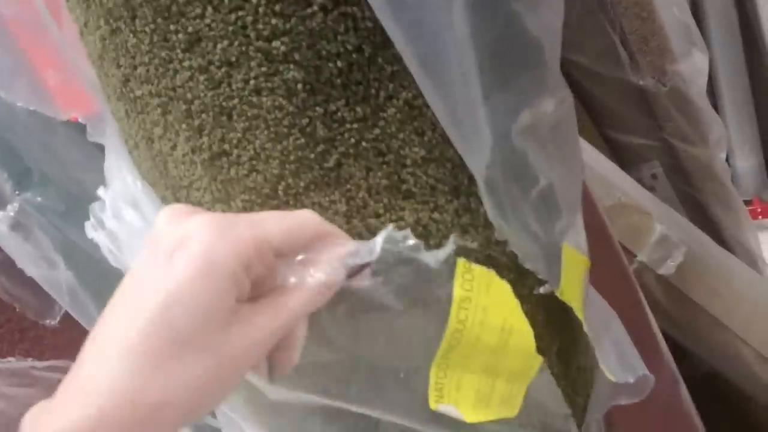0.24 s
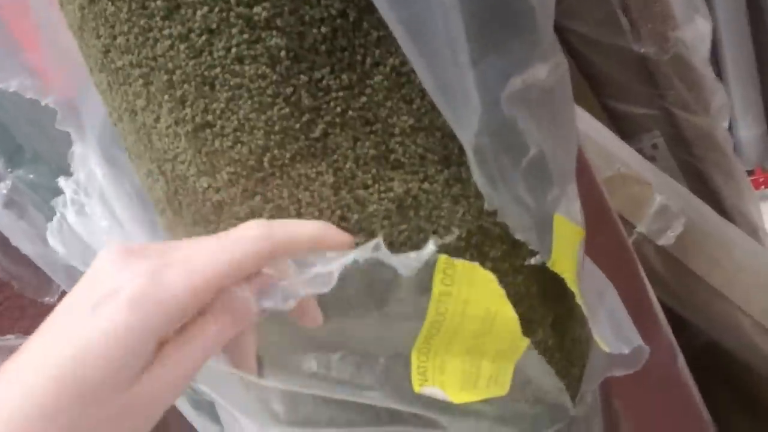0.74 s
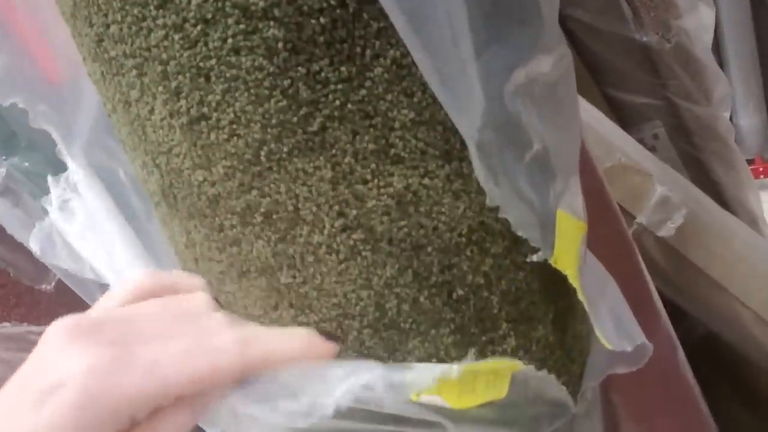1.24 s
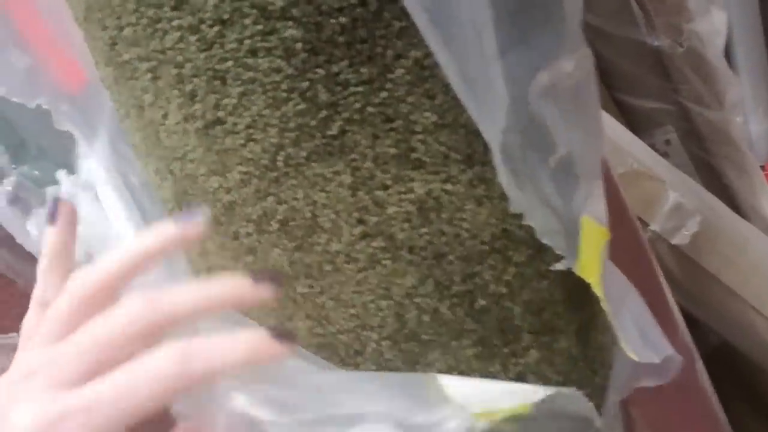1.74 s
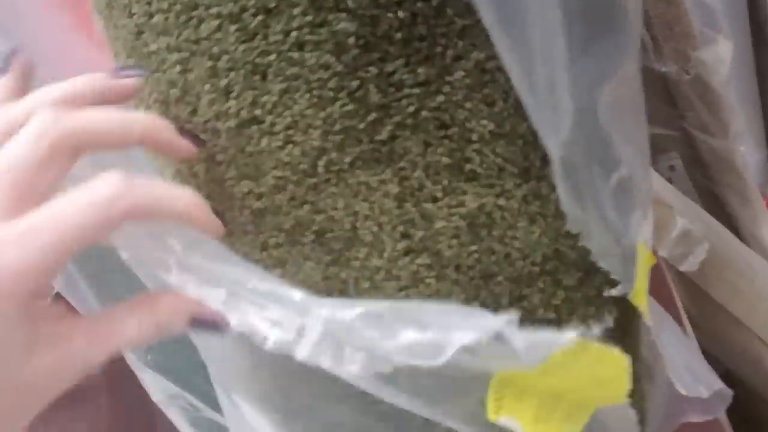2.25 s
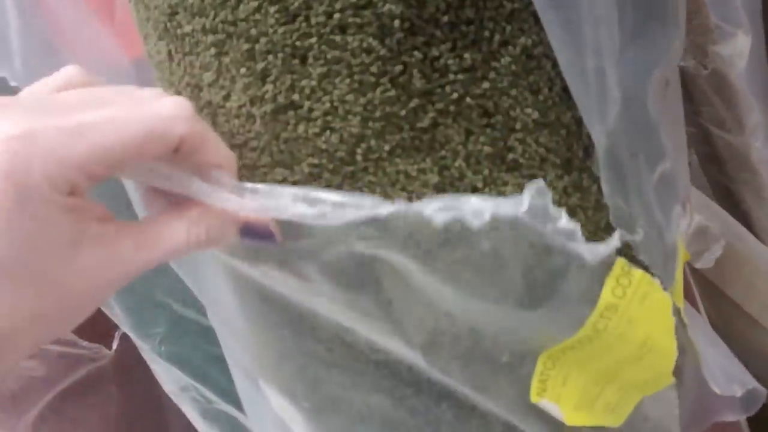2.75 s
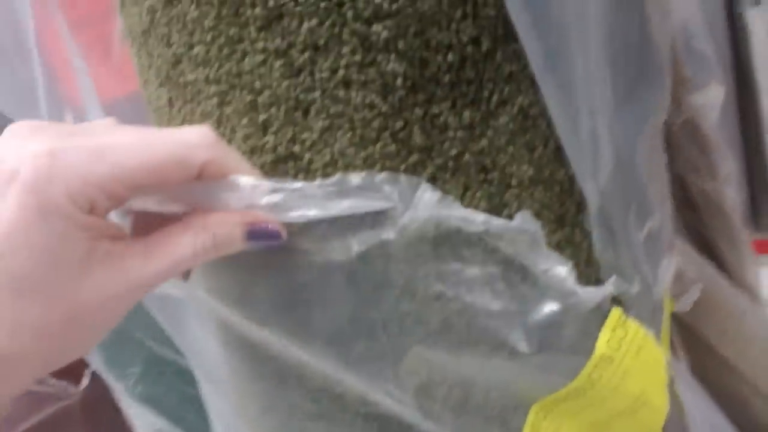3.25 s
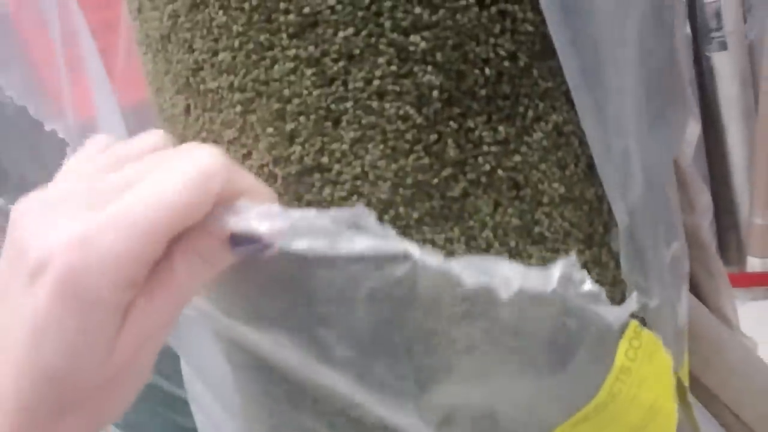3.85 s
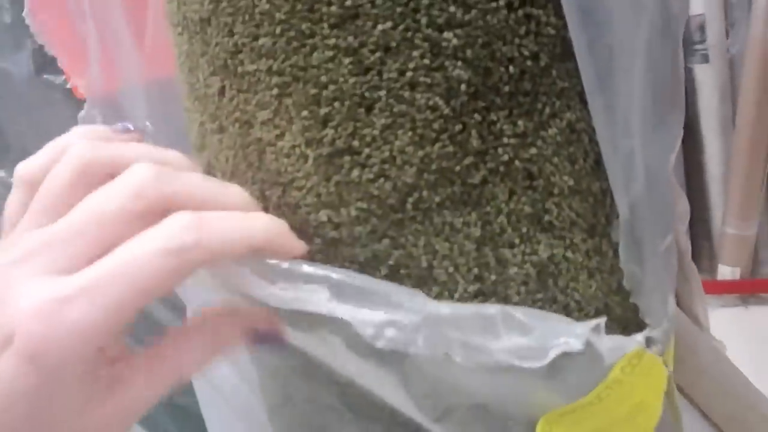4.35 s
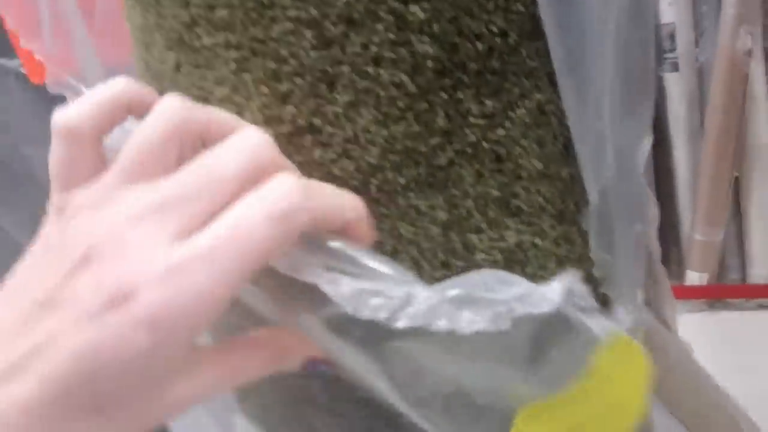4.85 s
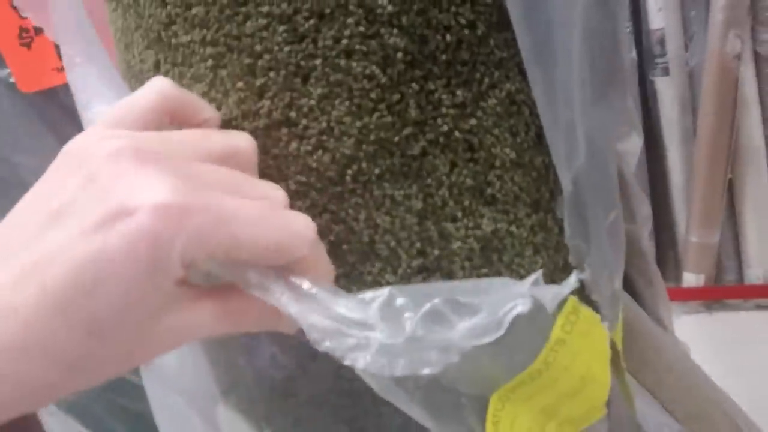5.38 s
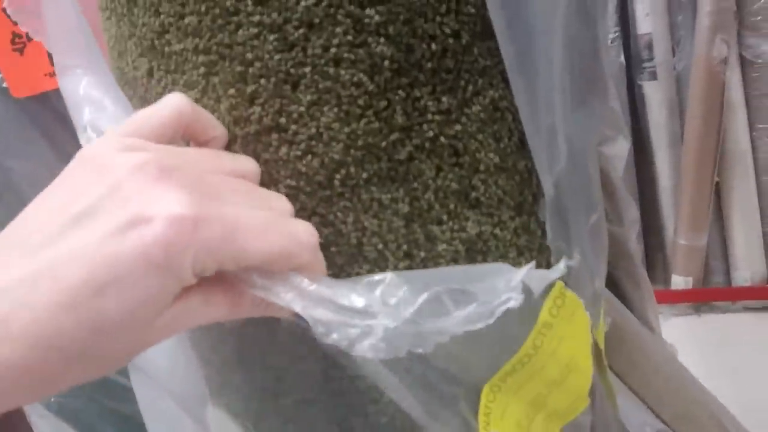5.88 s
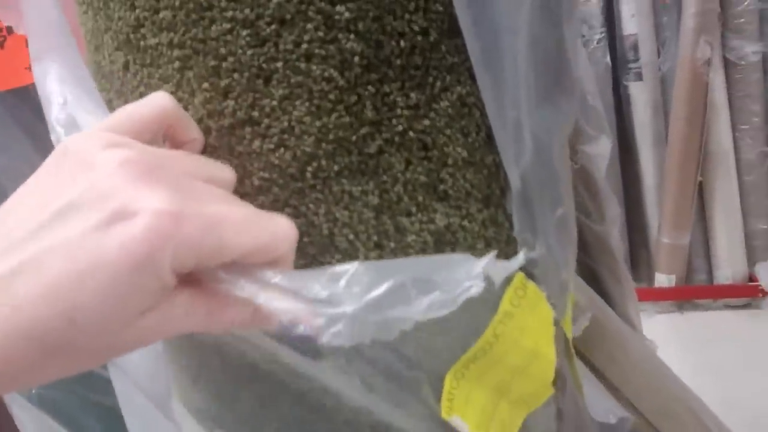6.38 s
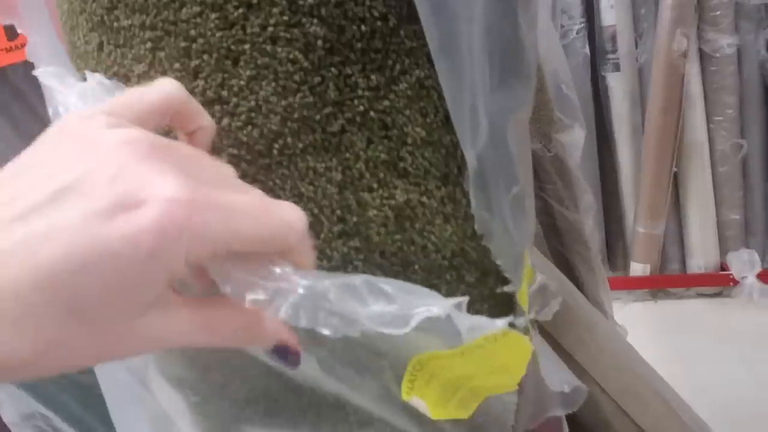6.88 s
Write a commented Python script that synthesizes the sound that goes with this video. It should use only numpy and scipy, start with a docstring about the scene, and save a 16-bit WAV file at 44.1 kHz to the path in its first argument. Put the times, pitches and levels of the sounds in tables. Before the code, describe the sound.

Close, irregular pops and crackles of clear plastic film being pulled and bent, whispering over carpet pile, a brief low air push near two seconds.

```python
"""Sharp snaps and crackles of thin plastic sheeting, pulled and crinkled by hand on a carpet roll.
Each snap is a crease flipping over: short tones ring small patches of film, and noise shivers on after.
Uneven noise makes the rustle of the bending film and its whisper as it slides over the pile.
Low noise rumbles, swelling briefly with a push of air; behind it all the hall's ventilation hums.
Two microphones close by hear it in stereo."""
import sys
import numpy as np
from scipy import signal
from scipy.fft import rfft, irfft, next_fast_len
from scipy.io import wavfile
from scipy.ndimage import map_coordinates

SR = 44100
rng = np.random.default_rng(int(sys.argv[2]) if len(sys.argv) > 2 else 0)


def bounce(signal):
    """Save signal as a 16-bit WAV file at the path given by the first command-line argument."""
    frames = np.transpose(np.atleast_2d(signal))
    limited = np.clip(frames, -1, 1)
    pcm = np.round(limited * 32767).astype(np.int16)
    wavfile.write(sys.argv[1], SR, pcm)


N = 313992  # length in samples

# Creases that snap: (time [s], main patch pitch [Hz], small patch pitch [Hz], energy of thump [dB],
# of main patch [dB], of small patches [dB], of crease edge [dB], of tick [dB], left over right [dB])
SNAPS = [(.0399, 1540, 2310, -41, -39, -34.5, -40, -48.5, -7),
         (.2073, 1010, 2320, -28, -19, -31, -50, -54, 3),
         (.2135, 1355, 1830, -23.5, -9, -17.5, -34, -39, -0.5),
         (.413, 1140, 2380, -40, -44, -45, -43, -31, 4.5), (.4321, 1020, 2080, -43, -35, -35, -47, -41, 1),
         (.4504, 1140, 1840, -36, -30, -41, -49, -55, -3), (.5466, 610, 1910, -34, -29, -30, -53, -47, 0),
         (.5654, 1160, 2460, -30, -24, -25, -43, -43, 1), (.6189, 1040, 2160, -54, -28, -43, -44, -43, -2),
         (.6722, 970, 2370, -28, -27, -40.5, -56, -56, -4),
         (.699, 750, 2100, -32.5, -30.5, -46, -58, -57, -5), (.8691, 970, 1810, -54, -29, -47, -60, -60, 1),
         (.9468, 1207, 2620, -41, -5.5, -2.5, -13, -16, 1),
         (.9519, 1170, 2500, -23, -41, -38, -28, -22, -1), (.9709, 1080, 2580, -22, -10, -6, -22, -21, 0.5),
         (1.0756, 920, 2190, -31, -33, -54, -50, -60, -3),
         (1.1052, 1080, 1790, -29, -32.5, -37, -58, -55, 2),
         (1.3994, 1730, 1890, -42, -43, -48, -39, -35.5, 0),
         (1.4129, 624, 3320, -42, -35, -22.5, -29.5, -45, -1),
         (1.4398, 650, 2800, -50, -35, -34, -40, -55, 0),
         (1.5055, 806, 3070, -33, -31, -24.5, -41, -49, 0.5),
         (1.7914, 790, 3300, -30, -36, -38, -36, -38, -7),
         (1.8216, 604, 2190, -44, -32, -40, -44, -31, -3.5),
         (1.8661, 610, 2170, -49, -31, -36, -39, -32, -5),
         (1.8834, 600, 3060, -28.5, -34, -38, -40, -48, 2),
         (1.9308, 680, 3320, -52, -38, -41, -47, -29, -3), (1.962, 610, 3680, -23, -35, -53, -59.5, -52, 1),
         (2.1022, 730, 2110, -47, -23, -28, -52, -54, 3), (2.1214, 1160, 2190, -34, -26, -52, -57, -54, 2),
         (2.149, 910, 2070, -21, -3.5, -9, -23, -28, -3.5),
         (2.1939, 730, 2280, -36, -24, -22.5, -54, -54, -3),
         (2.2439, 870, 3840, -48, -33, -42, -44.5, -55, -2),
         (2.3329, 615, 3080, -38, -29, -44, -59.5, -59, 2), (2.4385, 770, 2950, -27, -23, -26, -54, -59, 3),
         (2.602, 1150, 2490, -34, -8.5, -10.5, -27, -57, 1.5),
         (2.6115, 1120, 1850, -33, -32, -48, -37, -50, -2.5),
         (2.7315, 1150, 2590, -53, -27, -53, -59, -59, -2),
         (2.779, 950, 2140, -30, -25.5, -34.5, -47, -58, 2.5),
         (2.8196, 1350, 2390, -47, -31, -37, -58, -56, -8),
         (2.8345, 1280, 2060, -20, -34, -40, -58, -60, -2),
         (2.8557, 1420, 2270, -19, -6.5, -14.5, -18, -28, 0.5),
         (3.0421, 815, 2380, -37, -33, -42, -48, -60, -3), (3.1, 815, 2360, -39, -33, -45, -59, -65, 2),
         (3.1717, 1320, 2050, -50.5, -25, -19, -12, -19, -0.5),
         (3.364, 1410, 2100, -59, -23.5, -14, -20.5, -32, -1),
         (3.3961, 1100, 3100, -62, -25.5, -21.5, -19.5, -15.5, .5),
         (3.4574, 1170, 2450, -57, -23, -30.5, -52, -50, 2),
         (3.7483, 1050, 2090, -48, -31.5, -41, -48, -54, 0),
         (3.8788, 1070, 1810, -42, -35.5, -53, -57, -57, -1),
         (4.0208, 1460, 1980, -38, -27, -39, -40, -58, 0), (4.06, 895, 2300, -33.5, -30, -44, -57, -57, -4),
         (4.3834, 640, 3220, -50, -12.5, -18, -31, -35, 2),
         (4.4883, 603, 2130, -34, -35, -47, -38, -48, 3.5),
         (4.6583, 616, 2540, -33.5, -36, -47, -64, -50, 8),
         (4.7016, 1260, 3500, -40, -22, -26.5, -46, -48, -4),
         (4.7437, 795, 1830, -57, -30, -37, -39, -37, 4), (4.8967, 1210, 3210, -47, -34, -41, -35, -37, 0),
         (4.9157, 800, 2380, -33, -26, -35, -44, -47, -1),
         (4.933, 1440, 1810, -30.5, -29.5, -49, -56, -56, -3),
         (5.037, 980, 1790, -42, -21.5, -30, -53, -54, 1), (5.0607, 1020, 1820, -28, -20, -39, -52, -57, 0),
         (5.0802, 1020, 2050, -35, -22, -42, -51, -49, 0),
         (5.2082, 980, 1950, -21.5, -16, -23.5, -29, -40, 1),
         (5.2885, 1250, 1970, -42, -28, -54, -48, -56, -3),
         (5.3378, 1040, 1990, -32, -21, -29, -35.5, -41, 6.5),
         (5.3487, 1360, 1940, -41, -16, -13, -37, -49, -3),
         (5.519, 1200, 2420, -31, -18.5, -15, -35, -40, 1.5),
         (5.528, 1310, 1800, -50, -20, -41, -47.5, -49, -1),
         (5.717, 540, 2430, -29, -13.5, -22.5, -42, -46, 1.5),
         (5.7898, 1120, 1830, -25, -15, -50, -53, -55, -1.5),
         (6.0307, 1470, 2130, -29, -10.5, -13.5, -11.5, -5.5, 3),
         (6.036, 1050, 1810, -28, -37, -22, -24, -37, -4),
         (6.0493, 1110, 2660, -29, -13, -19.5, -33, -32, 0.5),
         (6.094, 1150, 3220, -28, -16.5, -27, -44, -42, 0.5),
         (6.1787, 1350, 1810, -32, -36, -58, -62, -61, -3),
         (6.2098, 1100, 2160, -49, -34.5, -40, -46, -48, -4),
         (6.3246, 1350, 1930, -27.5, -25, -38, -46, -52, -1),
         (6.3497, 810, 2410, -47, -29, -53, -59, -57, 6), (6.3758, 1200, 2510, -17, -8, -16, -30, -32, -1),
         (6.7464, 850, 2470, -49, -32, -46, -56, -45, 3), (6.9347, 1380, 2840, -38, -43, -40, -34, -39, 0),
         (6.9573, 1280, 2310, -25, -19.5, -26.5, -44, -37, 0),
         (6.9894, 1430, 4220, -45, -33, -56, -48, -41, -1),
         (7.0685, 1170, 2300, -29, -24, -43, -58, -54, -3),
         (7.0798, 1320, 2030, -23.5, -19, -30.5, -58, -59, -3),
         (7.0994, 1430, 1810, -44, -22, -45, -58, -61, -4)]
# Patches that ring in a snap, from large and slack to the crease tip: (lowest pitch [Hz],
# highest pitch [Hz], time to fade 60 dB [s], shiver against ring [dB], shiver's time to fade 60 dB [s])
PATCHES = [(269, 498, 0.02, -6.5, 0.082), (579, 1590, 0.017, -4.5, 0.035),
           (1990, 4080, 0.0066, -10.5, 0.03), (4270, 9150, 0.0041, -18, 0.085),
           (8740, 16300, 0.0038, -7, 0.035)]


def snaps():
    """Each crease creeps, flips and rings a few patches of every size; the film shivers on after it."""
    creep_db, creep_s, shiver_rise_s = -24, 0.0014, 0.00038
    out = np.zeros((2, N + SR))
    t = np.arange(SR // 16) / SR
    lead = SR // 250  # samples kept before the snap time
    noises = [soft_band_noise(low, high) for low, high, *_ in PATCHES]
    for s, main_hz, small_hz, *energy_db, pan_db in [*SNAPS, *crumples(), *faint_creases()]:
        left_lag_ms = -0.025 + 0.04 * pan_db  # a louder left side hears the snap later
        # time since the flip at each microphone
        since = t - lead / SR - .0005 - np.array([[1], [-1]]) * left_lag_ms / 2000
        after, before = np.maximum(since, 0), np.maximum(-since, 0)
        start = round(s * SR) - lead
        span = slice(start, start + len(t))
        side_gain = np.array([[pan_db], [-pan_db]]) / 2
        way = rng.choice([-1, 1])  # the film flips up or down
        leaders = (None, main_hz, small_hz, None, None)
        for patch, leader_hz, noise, db in zip(PATCHES, leaders, noises, energy_db):
            _, _, _, shiver_db, shiver_t60 = patch
            ring = way * patch_ring(patch, leader_hz, since)
            swell = amp(-60 * after / shiver_t60) * (1 - np.exp(-after / shiver_rise_s))
            creep = np.exp(-before / creep_s) * (before > 0)
            sound = unit(ring)
            sound += amp(shiver_db) * unit(noise[:, span] * swell)
            sound += amp(creep_db) * unit(noise[:, span] * creep)
            # a level of energy, so the length of the window does not count
            out[:, span] += sound * amp(db + side_gain) / np.sqrt(len(t))
    # thin film moves too little air to radiate bass
    high_pass = signal.butter(4, 250, "high", fs=SR, output="sos")
    return signal.sosfilt(high_pass, out[:, :N])


def patch_ring(patch, leader_hz, since, apart_s=.00003, rise_cycles=0.49):
    """Five patches of one size class ring as fading tones that all start with the flip."""
    low, high, t60, *_ = patch
    after, before = np.maximum(since, 0), np.maximum(-since, 0)
    hz = low * (high / low) ** ((np.arange(5) + rng.random(5)) / 5)
    strength = amp(rng.normal(0, 3.36, size=(5, 2, 1)))
    if leader_hz is not None:  # one patch leads; the nearer another is in size, the more it joins in
        hz[2] = leader_hz
        strength *= amp(-13 * np.abs(np.log2(hz / hz[2])))[:, None, None]
        strength[2] = 2.7
    # each patch lies elsewhere on the sheet, so its path to the two microphones differs
    path = rng.normal(0, apart_s, size=(5, 2, 1))
    # all patches swing the same way at the flip, which makes the sharp spike
    tones = np.cos(2 * np.pi * hz[:, None, None] * (since + path) - .3)
    fade = amp(-60 * after / t60)
    rise = np.exp(-(before * low / rise_cycles) ** 2)
    return np.sum(strength * tones, axis=0) * fade * rise


def soft_band_noise(low, high):
    """Stereo noise with gently sloping edges, for the film's creep and shiver."""
    noise = rng.standard_normal((2, N + SR))
    return filtered(noise, lambda hz: 1 / (1 + (low / (hz + 1)) ** 4 + (hz / high) ** 4))


# Crumples, runs of small creases: (start [s], length [s], energy of thump [dB], of main patch [dB],
# of small patches [dB], of crease edge [dB], of tick [dB])
CRUMPLES = [(1.752, 0.0053, -38.5, -33, -29.5, -18.5, -21), (1.842, 0.0097, -36, -38, -30.5, -37, -22.5),
            (2.169, .013, -34, -12.5, -29, -21, -22), (2.173, 0.026, -15, -21, -34, -45, -44)]


def crumples(count=7):
    """Each crumple is a run of creases of scattered time, pitch and size, listed like the snaps."""
    rows = []
    for s, length, *energy_db in CRUMPLES:
        for when, main, small, size, pan in rng.random((count, 5)):
            # the creases share the energy of the crumple
            share_db = np.add(energy_db, 9 * (size - .5) - 10 * np.log10(count))
            main_hz, small_hz = 650 + 700 * main, 1900 + 2000 * small
            rows.append((s + length * when, main_hz, small_hz, *share_db, 5 * (pan - .5)))
    return rows


# Typical energy of a faint crease: (thump [dB], main patch [dB], small patches [dB],
# crease edge [dB], tick [dB])
FAINT_ENERGY = (-45, -40, -48, -56, -54)


def faint_creases(count=70, scatter_db=4):
    """Faint creases at chance moments, the denser the harder the film bends, listed like the snaps."""
    share = np.cumsum(amp(curves(BEND)[0]))
    when, main, small = rng.random((count, 3)).T
    scatter = rng.standard_normal((count, 6))
    s = np.interp(when, share / share[-1], np.arange(N) / SR).clip(.01)
    energy_db = FAINT_ENERGY + scatter_db * scatter[:, :5]
    pan_db = 4 * scatter[:, 5] - 1.5
    return np.c_[s, 600 + 950 * main, 1800 + 2000 * small, energy_db, pan_db]


# How hard the film bends, heard as rustle: (time [s], level [dB])
BEND = [(0, -71), (.2, -67), (.45, -61), (.63, -61), (.8, -64), (1.05, -63.5), (1.19, -71.5), (1.44, -66),
        (1.75, -71), (1.89, -65.5), (2.16, -63), (2.43, -68), (2.55, -63), (2.88, -63), (3.0, -67.5),
        (3.42, -66), (3.53, -74), (3.78, -62), (3.88, -65), (4.05, -61.5), (4.32, -73), (4.5, -64),
        (4.75, -64), (5.04, -59.5), (5.17, -65.5), (5.34, -58), (5.65, -70), (5.85, -65), (6.05, -63),
        (6.21, -73), (6.39, -61.5), (6.7, -67), (6.93, -64), (7.12, -63)]
# Colour of the rustle: (frequency [Hz], level per Hz [dB])
RUSTLE = [(600, -26.5), (1000, -5.5), (1380, -3.5), (1700, -10.5), (2400, -8.5), (3000, -12), (3800, -13.5),
          (7000, -24)]


def rustle():
    """Bending film gives many tiny slips, made as noise of uneven strength."""
    level_db, = curves(BEND)
    return amp(level_db) * grainy(RUSTLE, spiky_db=3.0, clump_db=0.0, clump_rate=71)


# Colour of the slack folds: (frequency [Hz], level per Hz [dB])
DULL = [(180, -14.5), (340, 1.5), (550, -4), (850, -5), (1500, -25)]


def slack_folds(mean_db=-67, follows=0.29, flap_db=-14):
    """Slack folds sound dull; they follow the bending and flap in the push of air."""
    bend_db, = curves(BEND)
    draught_db, = curves(DRAUGHT)
    bending = amp(mean_db + follows * (bend_db - bend_db.mean()))
    flapping = amp(draught_db + flap_db)
    return (bending + flapping) * grainy(DULL, spiky_db=3.0, clump_db=2.0, clump_rate=27)


# The film slides over the pile: (time [s], whisper level [dB], level of its thin top [dB])
SLIDE = [(0, -87, -79), (.18, -74, -73), (.38, -65.5, -71), (.6, -64.5, -64.5), (.81, -74, -75),
         (.99, -58, -67), (1.12, -90, -84), (1.3, -67, -69), (1.5, -68, -82), (1.73, -60, -56.5),
         (1.89, -61, -60), (2.07, -65.5, -65.5), (2.2, -70, -70), (2.3, -65, -72), (2.45, -75, -78),
         (2.85, -71.5, -81), (3.0, -73, -79), (3.3, -78, -78), (3.42, -68, -68), (3.53, -80, -78),
         (3.69, -75, -75), (3.79, -64, -66), (3.97, -73, -77), (4.23, -63, -68), (4.36, -69.5, -72),
         (4.52, -59.5, -59.5), (4.77, -77, -71), (4.87, -86, -63), (4.96, -72, -73), (5.12, -85.5, -73),
         (5.3, -66, -71), (5.6, -78, -77), (5.92, -88, -78), (6.05, -63, -68), (6.24, -81, -77),
         (6.45, -68.5, -71), (6.75, -66, -68), (6.93, -59, -60.5), (7.12, -71, -68)]
# Colour of the whisper: (frequency [Hz], level per Hz [dB])
WHISPER = [(1500, -10), (3800, 1), (5000, 0), (6800, -3), (8600, 1), (10000, -7), (13000, -33)]
# Colour of the finest slips, the thin top: (frequency [Hz], level per Hz [dB])
THIN = [(6000, -26), (9500, -9), (11000, 3.5), (15000, 6.5), (16000, -3)]


def sliding():
    """Film sliding over the pile whispers, with the finest slips as a thin top."""
    whisper_db, thin_db = curves(SLIDE)
    whisper = amp(whisper_db) * grainy(WHISPER, spiky_db=-1.0, clump_db=1.3, clump_rate=66)
    thin = amp(thin_db) * grainy(THIN, spiky_db=3.0, clump_db=1.0, clump_rate=61)
    return whisper + thin


# A push of air: (time [s], level [dB])
DRAUGHT = [(1.55, -81), (1.7, -60), (2.08, -54), (2.18, -43.5), (2.26, -53.5), (2.46, -57), (3, -81.5)]
# Colour of the rumble: (frequency [Hz], level per Hz [dB])
RUMBLE = [(15, -31), (30, -4), (56, 2), (82, -5), (116, 1.5), (160, -4), (280, -10.5), (450, -39)]


def air_rumble(still_air_db=-68):
    """Moving air pushes low noise at the microphones, over a steady faint rumble."""
    draught_db, = curves(DRAUGHT)
    rumble = amp(draught_db) * grainy(RUMBLE, spiky_db=-1.5, clump_db=1.2, clump_rate=20)
    rumble += amp(still_air_db) * grainy(RUMBLE, spiky_db=0, clump_db=0.24, clump_rate=9)

    def uneven_push(hz):
        # the lowest air pushes the right microphone harder and with another timing
        level = amp([[-1], [1]] * np.clip(3 - hz / 50, 0, 3))
        timing = np.exp(.4j * np.array([[1], [-1]]) * (hz < 85))
        return level * timing

    return filtered(rumble, uneven_push)


# Colour of the hall's air noise: (frequency [Hz], level per Hz [dB])
HALL = [(100, -14), (300, 0), (900, 1.5), (3000, 0), (7700, -20), (12000, -11), (16000, -9.5)]
# Wavering ventilation tones: (pitch [Hz], width [Hz], level [dB])
HUM = [(54.5, 7.9, -89), (116.9, 3.3, -79.5), (359.3, 10.5, -79.5)]


def hall():
    """Steady air noise with a few fuzzy fan tones, each a narrow band of noise."""
    out = amp(-72.5) * spread(rng.standard_normal((2, N)), lambda hz: amp(along(HALL, hz)))
    for pitch, width, db in HUM:
        peak = lambda hz: 1 / (1 + ((hz - pitch) / width * 2) ** 2)
        out += amp(db) * spread(rng.standard_normal((2, N)), peak)
    return out


def grainy(spectrum, spiky_db, clump_db, clump_rate):
    """Coloured noise of uneven grain size, with clumps and slower surges as far as clump_db allows."""
    surges = wobble(clump_rate) + 0.3 * wobble(clump_rate / 5)
    size_db = spiky_db * rng.standard_exponential(N) + clump_db * surges
    grains = amp(size_db) * rng.standard_normal((2, N))
    return spread(grains, lambda hz: amp(along(spectrum, hz)))


# How alike the two microphones hear a spread-out sound: (frequency [Hz], likeness [0 to 1])
ALIKE = [(60, .9), (130, 0.95), (290, 0.81), (640, 0.31), (1400, 0.46), (3100, 0.17), (7000, 0)]


def spread(pair, gain):
    """Two unrelated signals coloured and mixed to the likeness of the two microphones, rms 1."""
    turn = lambda hz: np.arccos(np.clip(along(ALIKE, hz), -1, 1)) / 2
    mid, side = filtered(pair, lambda hz: gain(hz) * [np.cos(turn(hz)), np.sin(turn(hz))])
    return unit(np.array([mid + side, mid - side]))


def amp(db):
    """Decibels to gain."""
    return 10 ** (np.asarray(db) / 20)


def unit(x):
    """The sound scaled to rms 1."""
    return x / np.sqrt(np.mean(x ** 2) + 1e-20)


def along(points, hz):
    """Read (frequency [Hz], value) points, joined by lines on a log frequency axis."""
    f, v = np.transpose(points)
    return np.interp(np.log(hz + 1), np.log(f + 1), v)


def curves(rows):
    """One value per sample for each column after the time."""
    s, *columns = np.transpose(rows)
    return [np.interp(np.arange(N) / SR, s, column) for column in columns]


def wobble(rate):
    """A smooth random curve through rate random points a second."""
    points = rng.standard_normal(int(N * rate / SR) + 4)
    return map_coordinates(points, [np.arange(N) * rate / SR])


def filtered(x, response):
    """The sound x with each frequency multiplied by the response."""
    m = next_fast_len(x.shape[-1] + 4096)
    spectrum = rfft(x, m) * response(np.fft.rfftfreq(m, 1 / SR))
    return irfft(spectrum, m)[..., :x.shape[-1]]


def scene():
    """Sheeting in the hand, in the hall."""
    handling = rustle() + slack_folds() + sliding() + air_rumble()
    return snaps() + handling + hall()


def record(dry, top_hz=15900):
    """Nothing is kept above the band limit."""
    return filtered(dry, lambda hz: hz < top_hz)


dry = scene()
out = record(dry)
bounce(out)
```